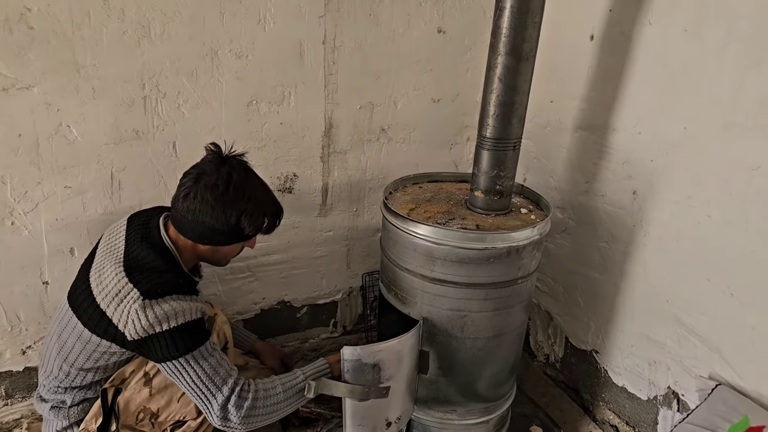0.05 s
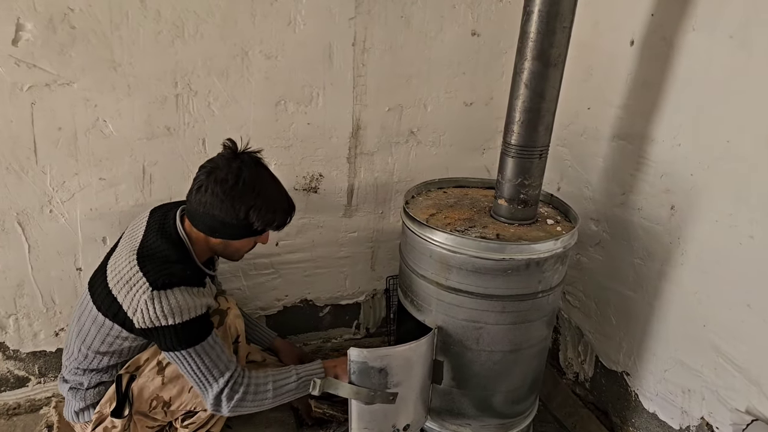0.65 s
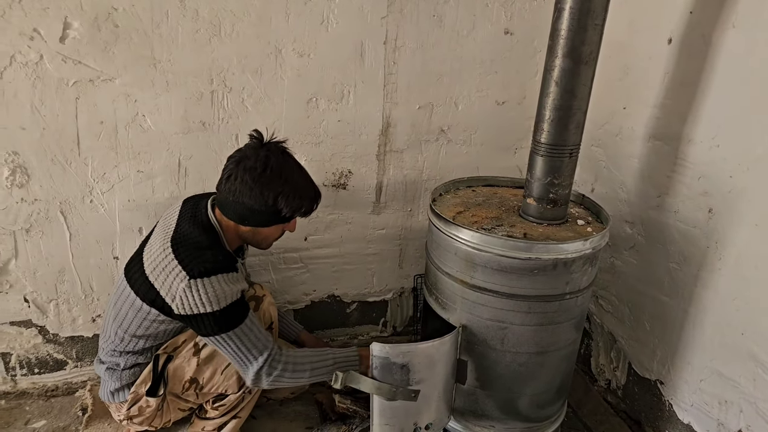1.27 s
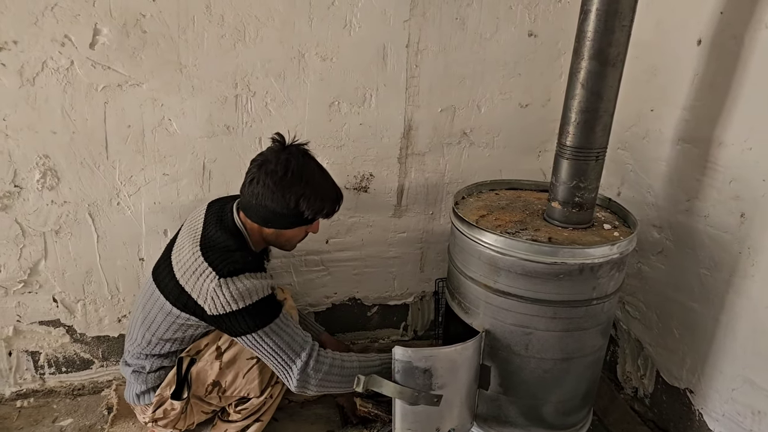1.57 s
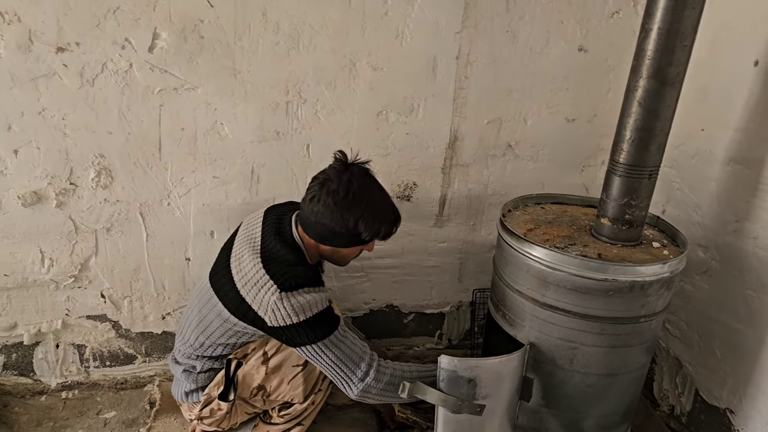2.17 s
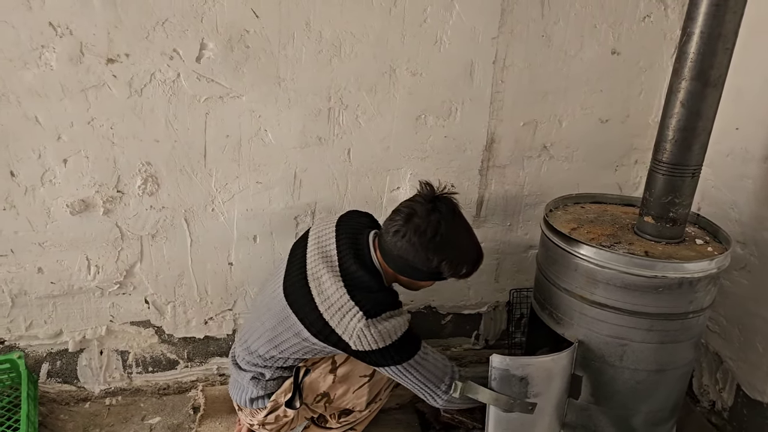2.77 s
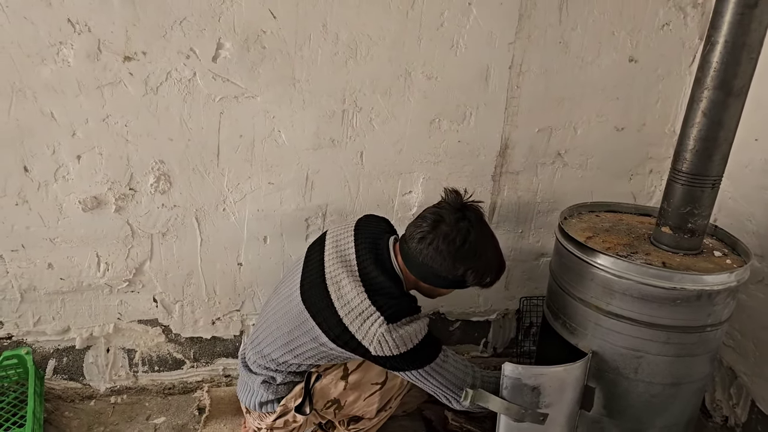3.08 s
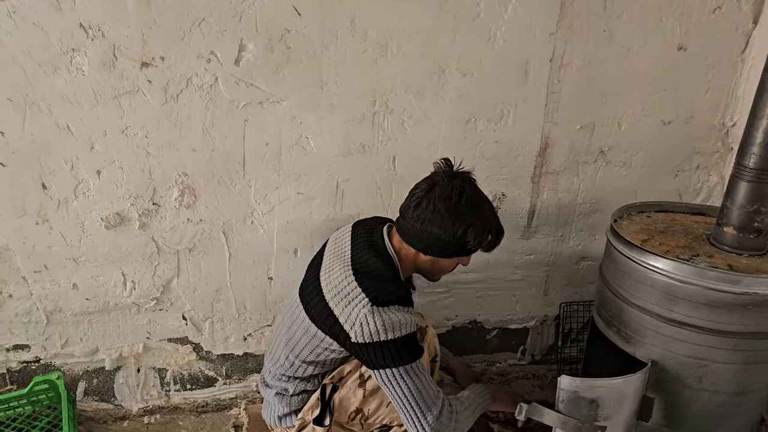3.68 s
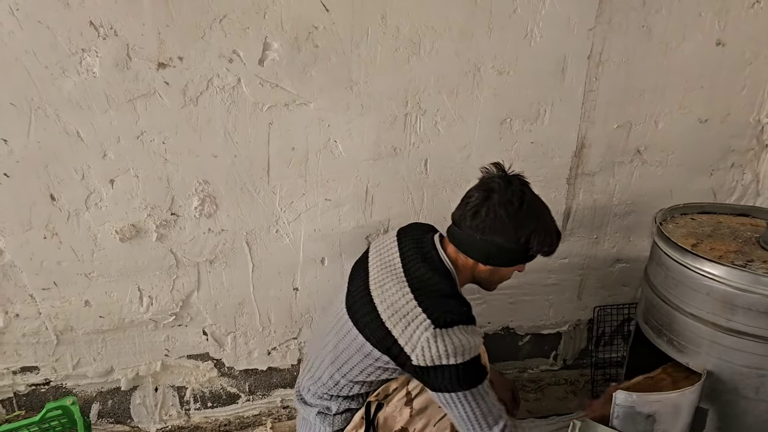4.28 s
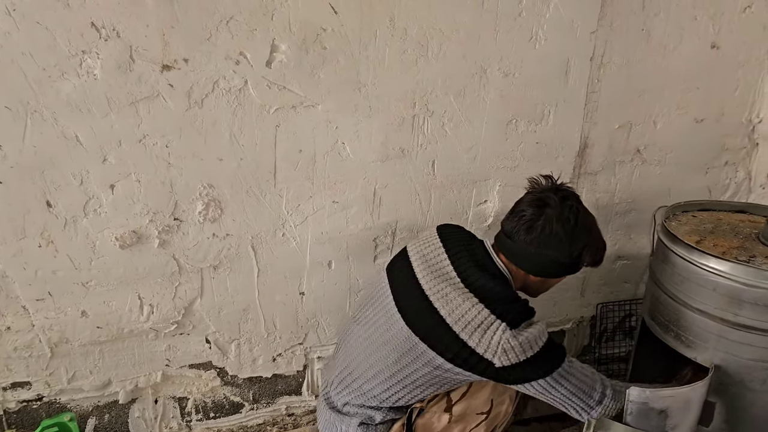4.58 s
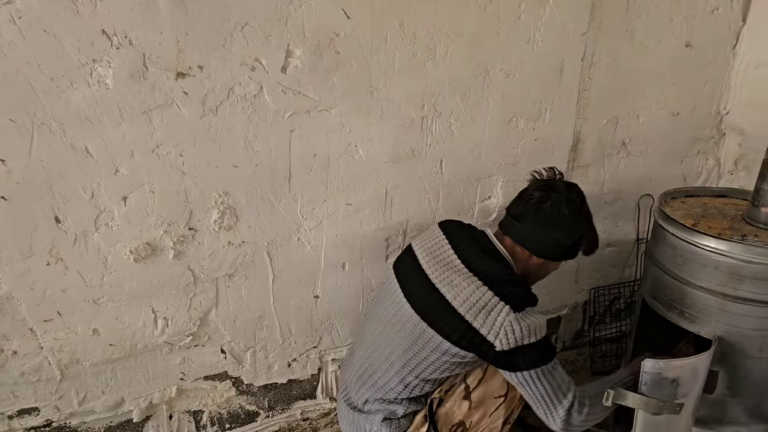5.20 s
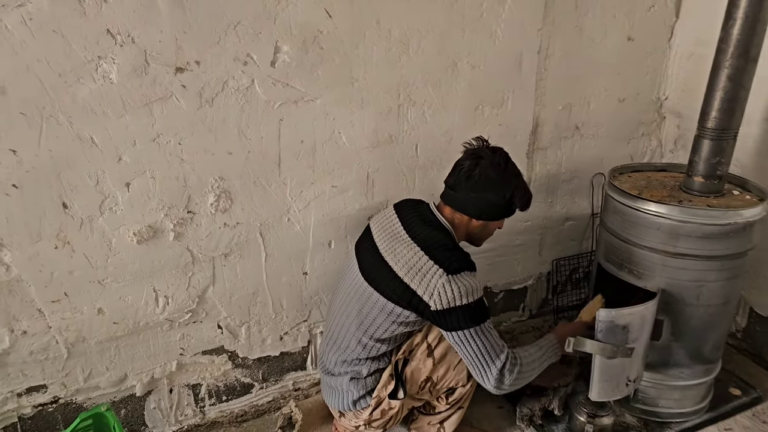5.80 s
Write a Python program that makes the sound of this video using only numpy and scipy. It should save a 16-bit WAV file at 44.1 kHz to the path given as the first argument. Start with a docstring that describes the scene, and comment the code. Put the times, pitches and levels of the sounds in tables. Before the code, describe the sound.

Logs and sticks are pushed into a sheet-metal stove, with irregular wooden clacks, rough scrapes and hollow booms indoors.

```python
"""Firewood is pushed into a sheet-steel drum stove in a small plastered room.
Sticks knock, scrape and tumble inside: each touch makes the wood clack and the drum boom under it.
Three logs slap down, and the hardest one leaves the drum's wall and lid ringing.
A slowly sinking hiss and a faint low rumble lie underneath.
The right microphone sounds brighter than the left."""
import sys
import numpy as np
from scipy import signal
from scipy.fft import rfft, irfft, next_fast_len
from scipy.io import wavfile
from scipy.ndimage import uniform_filter1d

SR = 44100
rng = np.random.default_rng(int(sys.argv[2]) if len(sys.argv) > 2 else 0)


def transcribe(u):
    """Save the signal u as a 16-bit wav file named by the first command-line argument.

    u: samples, shape (n,) or (channels, n), limited to [-1, 1]; the rate is SR.
    q: integer samples, one column per channel.
    """
    v = np.clip(np.atleast_2d(u).T, -1, 1)
    q = np.round(v * 32767).astype(np.int16)
    wavfile.write(sys.argv[1], SR, q)


N = 266804
HIT = np.arange(int(.9 * SR)) / SR  # the clock of one hit, in seconds
LEAD_S = .01  # a stick grazes this long before it strikes
CHATTER_S = .017  # a falling piece's chatter dies by 20 dB in this time
DETUNE = 0.0055  # the load presses on the steel and shifts its tones a little from blow to blow


def knocks():
    """Single sticks bump against the drum and each other."""
    # t/s, clack/dB, bright edge/dB, thud/dB, thud pitch/Hz, chatter time/s
    bumps = [(0.01, -27.5, -28.5, -36.5, 127, 0.014), (0.058, -35.5, -30.5, -37.5, 126, .025),
             (0.521, -21.5, -23, -28.5, 246, 0.015), (1.425, -30.5, -23.5, -31.5, 211, 0.096),
             (1.624, -24.5, -29, -30, 129, .025), (1.671, -30.5, -19.5, -39, 135, .011),
             (1.736, -36, -23.5, -42, 238, .017), (1.779, -23, -35, -31, 178, 0.013),
             (1.841, -23.5, -23, -56, 304, 0.02), (1.898, -31.5, -22.5, -53, 200, 0.042),
             (2.028, -35.5, -29, -52, 245, .015), (2.066, -25.5, -19, -39.5, 230, .03),
             (2.083, -28.5, -24.5, -29.5, 140, .017), (2.269, -39, -44, -66, 167, 0.022),
             (4.681, -30, -30, -25.5, 183, 0.037), (5.776, -26.5, -34.5, -26, 262, 0.03)]
    out = np.zeros((2, N))
    for s, clack_db, edge_db, thud_db, thud_hz, chatter_s in bumps:
        add(out, s - LEAD_S, contact(clack_db, edge_db, thud_db, thud_hz, chatter_s))
    return out


def logs():
    """Each log slaps down in three quick touches; the stove's floor gives and springs back."""
    # logs thrown in: t/s, clack/dB, bright edge/dB, thud/dB, thud pitch/Hz, floor swing/dB
    throws = [(1.117, -13.5, -14.5, -25, 300, -34), (2.903, -12.5, -13.5, -18.5, 172, -18.5),
              (4.75, -15.5, -20, -14, 344, -19)]
    # one end lands, then the side, then the other end: delay/s, extra clack/dB, edge/dB, thud/dB
    touches = [(0, 1, .5, -4.5), (0.0111, -1.5, -.5, -0.5), (.026, -4, -15, -5.5)]
    floor_hz, floor_delay_s = 120, 0.0229
    five_swings = np.sin(np.pi * np.minimum(HIT * floor_hz / 5, 1)) ** 2
    floor = np.sin(2 * np.pi * floor_hz * HIT) * five_swings
    out = np.zeros((2, N))
    for s, clack_db, edge_db, thud_db, thud_hz, floor_db in throws:
        for delay, more_clack, more_edge, more_thud in touches:
            slap = contact(clack_db + more_clack, edge_db + more_edge, thud_db + more_thud, thud_hz)
            add(out, s + delay - LEAD_S, slap)
        add(out, s + floor_delay_s - 1 / floor_hz, amp(floor_db) * floor)  # starts one swing early
    return out


def tumble(count):
    """The last log upsets the pile: sticks fall at slightly uneven gaps, ever more softly."""
    # the first stick to fall: t/s, clack/dB, bright edge/dB, thud/dB
    first_fall = (4.791, -19, -23.5, -24.5)
    # how much softer each next stick is: clack/dB, bright edge/dB, thud/dB
    loss_db = (2.5, 1.5, 4)
    s, *first_db = first_fall
    gap_s = .03
    out = np.zeros((2, N))
    for k, slip in enumerate(rng.uniform(-0.062, .1, count)):
        levels_db = np.array(first_db) - k * np.array(loss_db)
        add(out, s + (k + slip) * gap_s - LEAD_S, contact(*levels_db, thud_hz=157))
    return out


def wall_blow():
    """The hardest log leaves the drum's wall and lid ringing."""
    # tones of the struck wall: f/Hz, level/dB, time to fade by 60 dB/s
    wall_tones = [(173.2, 4.5, 0.87), (240, -2.5, 0.74), (254, 3.5, 0.63), (302, -27, 1), (492, -11, 0.55),
                  (573, 4, 0.11), (664, -27, 0.4), (696, -10, 0.43), (926, -21, 0.48), (1110, -30, 0.5),
                  (1378, -25, 0.43), (1600, -8, 0.21), (2170, -14, 0.71)]
    # the lid's two close tones, which beat together: f/Hz, level/dB, time to fade by 60 dB/s
    lid_tones = [(2046, 0, 1.5), (2054, -3, 1.4)]
    # the blow: t/s, level/dB
    blow = (2.922, -24.5)
    s, db = blow
    wall = ring(wall_tones, scatter_db=2.5, attack_s=0.0012, flutter_db=0, detune=0)
    lid = ring(lid_tones, scatter_db=1, attack_s=.02, flutter_db=5, detune=0)
    out = np.zeros((2, N))
    add(out, s, amp(db) * (wall + amp(-24) * lid))
    return out


def shoves():
    """Wood is shoved over ash and steel: bark rubs and the drum rumbles, swelling and fading."""
    # loudest moment t/s, rub/dB, rumble/dB, rumble pitch/Hz, half width of the swell/s
    pushes = [(0.498, -30, -35.5, 170, 0.017), (1.216, -39, -35, 308, .03), (1.391, -25, -38, 117, 0.04),
              (1.496, -29, -55, 120, 0.041), (1.66, -27, -46, 130, 0.13), (1.806, -41, -39.5, 130, 0.032),
              (2.058, -27, -63, 140, 0.069), (3.33, -45, -41, 130, 0.063), (3.519, -35, -45, 240, 0.039),
              (3.89, -39.5, -37.5, 186, 0.12), (4.87, -22, -34, 326, 0.084), (5.02, -23.5, -38, 300, 0.024),
              (5.354, -37, -48, 208, 0.18), (5.61, -39, -37, 252, 0.049), (5.68, -36, -41, 278, 0.072),
              (5.869, -37, -35, 235, 0.13)]
    peak_s, linger_db, linger_fade_s = .2, -11.5, 1.3
    from_peak = np.abs(HIT - peak_s)
    out, n = np.zeros((2, N)), len(HIT)
    for s, rub_db, rumble_db, pitch_hz, width_s in pushes:
        swell = np.exp(-(from_peak / max(width_s, .005)) ** 2)
        swell += (HIT > peak_s) * amp(linger_db - 60 * from_peak / linger_fade_s)  # the room answers
        grip = bark(n, rate=140, depth_db=2)
        rub = unit(coloured(diffuse(n) * grip, lambda hz: wood_colour(hz, ring_db=-2.5)))
        less_bass = lambda hz: drum_colour(hz, pitch_hz) * hz ** 2 / (hz ** 2 + 170 ** 2)
        rumble = unit(coloured(diffuse(n), less_bass))
        scrape = amp(rub_db - 10) * rub + amp(rumble_db - 4) * rumble
        add(out, s - peak_s, uniform_filter1d(swell, 300) * scrape)
    return out


def contact(clack_db, edge_db, thud_db, thud_hz, chatter_s=CHATTER_S):
    """One touch of wood clacks, splinters a little and shakes the drum; levels are relative."""
    splinter_db = min(edge_db - 28, -50)
    after_strike = amp(splinter_db) * crackle() + amp(thud_db - 5.5) * thud(thud_hz)
    return clack(clack_db, edge_db, chatter_s) + at_strike(after_strike)


def clack(body_db, edge_db, chatter_s):
    """A stick grazes, strikes and chatters; its woody body and bright edge echo in the firebox."""
    # tinny tones of the firebox: f/Hz, level/dB, time to fade by 60 dB/s
    tin_tones = [(679, -5, 0.76), (984, -3, 0.5), (1123, -0.5, 0.36), (1280, -12, 0.67), (1440, -2, 0.1),
                 (1580, 7, 0.26), (1800, -4, 0.14), (2060, -3, 0.45), (2380, -10, 0.41)]
    n, t = len(HIT), HIT - LEAD_S
    graze_db = -13 + 20 * t / .008
    fade_db = -20 * t / max(chatter_s, .002)
    grip = amp(np.where(t < 0, graze_db, fade_db))
    chatter = rng.standard_normal(n) * bark(n, rate=900, depth_db=8) * grip
    chatter *= 0.85 * np.sqrt(chatter_s / CHATTER_S) / np.linalg.norm(chatter)
    chatter[round(LEAD_S * SR)] += 1  # the strike
    echoes = signal.fftconvolve(chatter[None], firebox(fade_s=0.15, room_db=-9), axes=1)[:, :n]
    note_hz = rng.uniform(850, 1700)  # each stick has a note of its own
    note = lambda hz: amp(4.5 / (1 + ((hz - note_hz) / 50) ** 2))
    sound = coloured(echoes, lambda hz: wood_colour(hz, ring_db=10.5) * note(hz))
    body = signal.sosfilt(signal.butter(4, 2700, "low", fs=SR, output="sos"), sound)
    edge = signal.sosfilt(signal.butter(4, 2700, "high", fs=SR, output="sos"), sound)
    tin = at_strike(ring(tin_tones, scatter_db=3, attack_s=.002, flutter_db=3, detune=DETUNE))
    body = crest(body, size=180) + amp(-21.5) * crest(tin, size=180)
    return amp(body_db - 7) * body + amp(edge_db - 5.5) * crest(edge, size=180)


def wood_colour(hz, ring_db):
    """How strong each pitch is when wood is touched; the sticks ring at random strengths."""
    # the broad sound of a clack: f/Hz, level/dB
    spectrum = [(120, -29.5), (300, -11.5), (440, -11), (600, -12.5), (900, -9.5), (1400, -12),
                (2000, -13.5), (2700, -12.5), (3750, -3.5), (4500, -8), (5200, -21), (7000, -37.5),
                (10000, -65), (15500, -103)]
    # ring of dry wood: f/Hz, width/Hz, level/dB (not used)
    tones = [(628, 13, -6), (844, 130, -5), (1340, 18, -6), (1990, 110, -9), (2284, 8.7, -10),
             (3670, 28, -2), (3910, 20, 0)]
    peaks = sum(rng.uniform(0, 0.66) / (1 + ((hz - centre) / (width / 2 + 15)) ** 2)
                for centre, width, _ in tones)
    return amp(along(spectrum, hz) + ring_db * peaks)


def thud(centre_hz):
    """The heavy steel takes a few milliseconds to start moving, then booms."""
    # tones of the whole drum: f/Hz, level/dB, time to fade by 60 dB/s
    drum_tones = [(124.1, -7, 0.69), (155.6, -5.5, 1), (209.3, -10.5, 1), (236, -7, 0.86),
                  (307.5, -2, 0.74), (384, -15, 0.39), (509, -8.5, 0.58), (658, -15.5, 1), (905, -14, 0.66)]
    push = firebox(fade_s=0.21, room_db=-4.5) * (1 - np.exp(-HIT / 0.0023))
    dull = coloured(push, lambda hz: drum_colour(hz, centre_hz))
    boom = ring(drum_tones, scatter_db=2, attack_s=.01, flutter_db=1.5, detune=DETUNE)
    return crest(dull, size=900) + amp(-4) * crest(boom, size=900)


def drum_colour(hz, centre_hz):
    """The drum sounds dull, and the spot that is touched favours one pitch."""
    # the broad sound of a thud: f/Hz, level/dB
    spectrum = [(25, -49.5), (45, -22), (70, -38), (110, 9.5), (150, 3.5), (300, -1), (500, -9),
                (900, -16.5), (2000, -26), (5000, -82)]
    spot_db, spot_octaves = 8.5, 0.32
    spot = np.exp(-(np.log2((hz + 1) / centre_hz) / spot_octaves) ** 2)
    return amp(along(spectrum, hz) + spot_db * spot)


def ring(tones, scatter_db, attack_s, flutter_db, detune):
    """Each blow rings the steel's tones at new strengths; loose wood makes them flutter."""
    hz, db, fade_s = np.transpose(tones)[:, :, None]
    hz = hz * (1 + detune * rng.standard_normal(hz.shape))
    flutter = np.array([bark(len(HIT), rate=21, depth_db=flutter_db) for _ in tones])
    level = flutter * amp(db + scatter_db * rng.standard_normal(hz.shape) - 60 * HIT / fade_s)
    swing = np.sin(2 * np.pi * (hz * HIT + rng.random(hz.shape)))
    return (level * swing).sum(0) * (1 - np.exp(-HIT / attack_s))


def crackle():
    """Bark splinters with a snap and a short, bright crackle."""
    # splintering bark: f/Hz, level/dB
    spectrum = [(3000, -21), (6000, -1), (8500, 1), (10700, -12.5), (12000, -6), (15500, -24)]
    grit = firebox(fade_s=0.14, room_db=-8) * bark(len(HIT), rate=700, depth_db=5)
    grit[:, 0] += np.sqrt(SR / 1000)  # the snap
    return crest(coloured(grit, lambda hz: amp(along(spectrum, hz))), size=180)


def firebox(fade_s, room_db):
    """Dense echoes inside the drum die by 60 dB in fade_s; the room follows."""
    return diffuse(len(HIT)) * amp(-60 * HIT / fade_s) + amp(room_db) * room_tail()


def room_tail():
    """A fresh echo of the room, in which each pitch dies at its own speed."""
    # the room's echo: f/Hz, time to fade by 60 dB/s
    fade_times = [(70, 0.057), (130, 1), (250, 0.92), (600, 0.73), (2000, 0.58), (4500, 0.52),
                  (12000, 0.52)]
    hz, t, bands = signal.stft(diffuse(len(HIT)), SR, nperseg=256)
    fade = amp(-60 * t / along(fade_times, hz)[:, None])
    tail = signal.istft(bands * fade, SR, nperseg=256)[1][:, :len(HIT)]
    return tail * (1 - np.exp(-HIT / 0.0073))


def background():
    """A wavering, slowly sinking hiss, the air of the room and a low rumble that swells and fades."""
    # the colours of the three noises: f/Hz, level/dB
    hiss_spectrum = [(1200, -51), (2600, -15.5), (3100, -2.5), (3700, 2), (4500, -5), (5450, -8), (5820, 1),
                     (6150, -7), (6500, -11.5), (7000, -25), (8500, -21), (10700, -36.5), (11700, -36.5),
                     (15500, -50)]
    air_spectrum = [(24, -57), (40, -10), (165, -11.5), (196, -2.5), (259, -11), (303, -4), (461, -14.5),
                    (503, -3.5), (610, -14), (666, -7), (1140, -13.5), (2600, -13), (3380, -38),
                    (5720, -120)]
    rumble_spectrum = [(25, -47), (42, -30), (55, 26), (68, 8), (100, -39), (200, -51)]
    # the rumble of the draught over time: t/s, level/dB
    draught = [(0, -62), (1.2, -64), (1.8, -53), (2.4, -96), (6.05, -90)]
    t = np.arange(N) / SR
    hiss_db = -41 - t  # sinks 1 dB a second
    rumble_db = np.interp(t, *np.transpose(draught))
    noise = lambda spectrum: unit(coloured(diffuse(N), lambda hz: amp(along(spectrum, hz))))
    hiss = amp(hiss_db) * bark(N, rate=7, depth_db=2) * noise(hiss_spectrum)
    return hiss + amp(-53) * noise(air_spectrum) + amp(rumble_db) * noise(rumble_spectrum)


def diffuse(n):
    """White noise at two close microphones: alike in the bass, unrelated in the treble."""
    # how alike left and right are: f/Hz, likeness from 0 to 1
    likeness = [(60, 0.91), (150, 0.97), (280, 0.81), (500, 0.62), (1000, 0.15), (4000, 0)]
    m = next_fast_len(n)
    turn = np.arccos(np.clip(along(likeness, np.fft.rfftfreq(m, 1 / SR)), -1, 1)) / 2
    white = rfft(rng.standard_normal((2, m)))
    mid, side = irfft(white * [np.cos(turn), np.sin(turn)], m)[:, :n]
    return np.array([mid + side, mid - side])


def bark(n, rate, depth_db):
    """An uneven gain, like the grip of rough bark, that takes rate new values a second."""
    knots = rng.standard_normal(n // 20)
    return amp(depth_db * np.interp(np.arange(n) * rate / SR, np.arange(len(knots)), knots))


def coloured(x, gain):
    """Give each frequency its gain, with no ringing ahead of the sound (a minimum-phase filter)."""
    n = x.shape[-1]
    m = 2 * next_fast_len(n // 2 + SR // 20)
    cepstrum = irfft(np.log(np.maximum(gain(np.fft.rfftfreq(m, 1 / SR)), 1e-6)))
    cepstrum[..., 1:m // 2] *= 2
    cepstrum[..., m // 2 + 1:] = 0
    return irfft(rfft(x, m) * np.exp(rfft(cepstrum)), m)[..., :n]


def amp(db):
    """Turn decibels into a gain."""
    return 10 ** (np.asarray(db) / 20)


def unit(x):
    """Scale to an average (rms) level of 1."""
    return x / np.sqrt(np.mean(x ** 2) + 1e-20)


def crest(x, size):
    """Scale so that the loudest stretch of size samples has an average (rms) level of 1."""
    power = np.mean(np.atleast_2d(x) ** 2, axis=0)
    return x / np.sqrt(uniform_filter1d(power, size).max() + 1e-20)


def along(points, hz):
    """Read between rows of f/Hz, value, with the octaves evenly spaced."""
    f, v = np.transpose(points)
    return np.interp(np.log(hz + 1), np.log(f + 1), v)


def at_strike(x):
    """Delay a sound by LEAD_S, to the moment of the strike."""
    return np.roll(x, round(LEAD_S * SR), axis=-1) * (HIT >= LEAD_S)


def add(track, s, sound):
    """Mix a sound into the track at s seconds."""
    start = max(0, round(s * SR))
    track[:, start:start + sound.shape[-1]] += sound[..., :N - start]


def scene():
    """The stove being loaded in the quiet room."""
    return knocks() + logs() + tumble(count=5) + wall_blow() + shoves() + background()


def record(dry):
    """Each microphone opening has its own colour; the deepest bass and the top are cut off."""
    # balance of the microphones: f/Hz, left minus right/dB
    balance = [(100, 0), (300, 1), (700, 0), (1400, -1), (2200, -3.5), (2900, -8.5), (3700, -16.5),
               (4600, -12), (6000, -8.5), (7000, -3), (9000, 5), (12000, -2)]
    low_cut_hz, top_hz = 55, 15700

    def microphones(hz):
        ratio = amp(along(balance, hz))
        low_cut = 1 / np.sqrt(1 + (low_cut_hz / (hz + 1)) ** 8)
        return low_cut * np.array([ratio, np.ones_like(ratio)]) / np.sqrt((1 + ratio ** 2) / 2)
    m = next_fast_len(N + SR // 2)
    below_top = np.fft.rfftfreq(m, 1 / SR) < top_hz
    return irfft(rfft(coloured(dry, microphones), m) * below_top, m)[:, :N]


dry = scene()
out = record(dry)
transcribe(out)
```